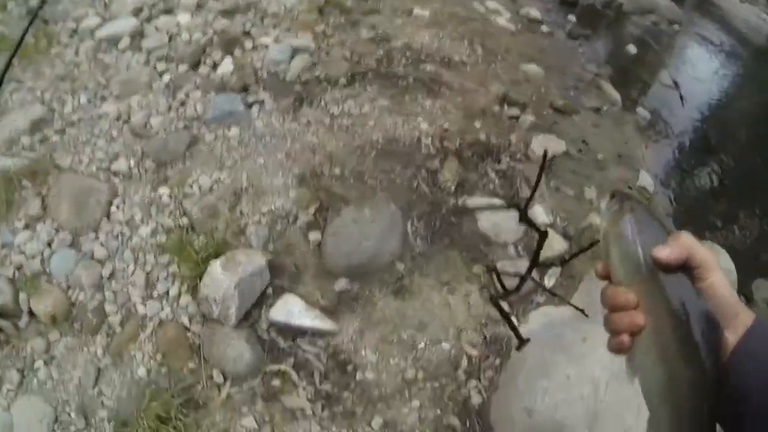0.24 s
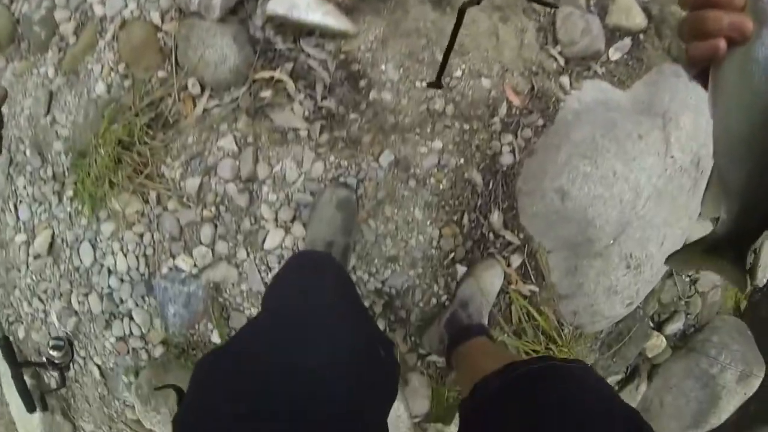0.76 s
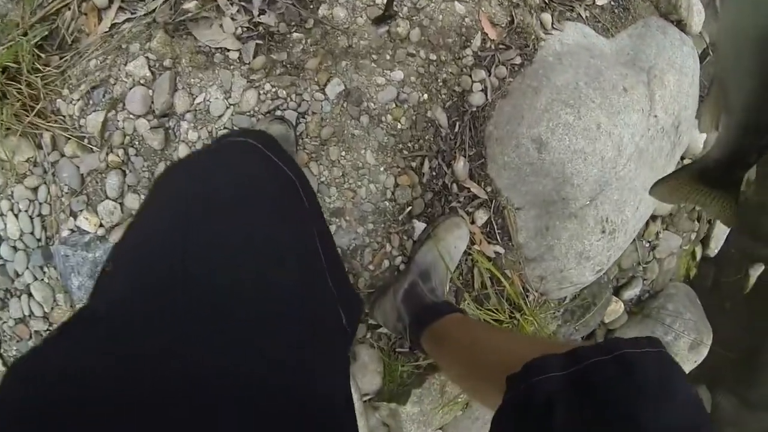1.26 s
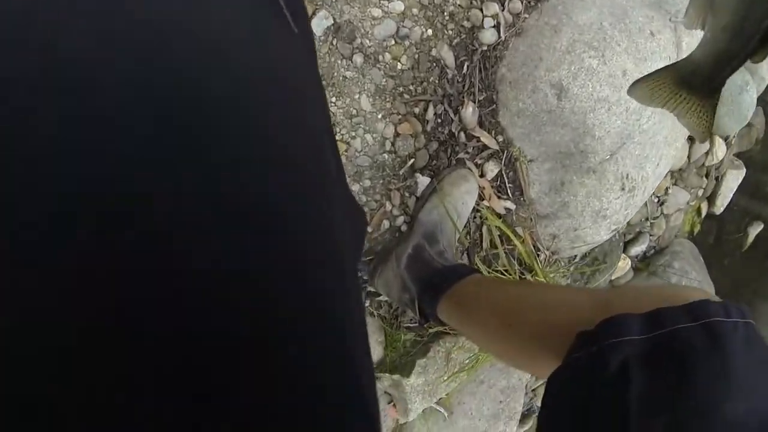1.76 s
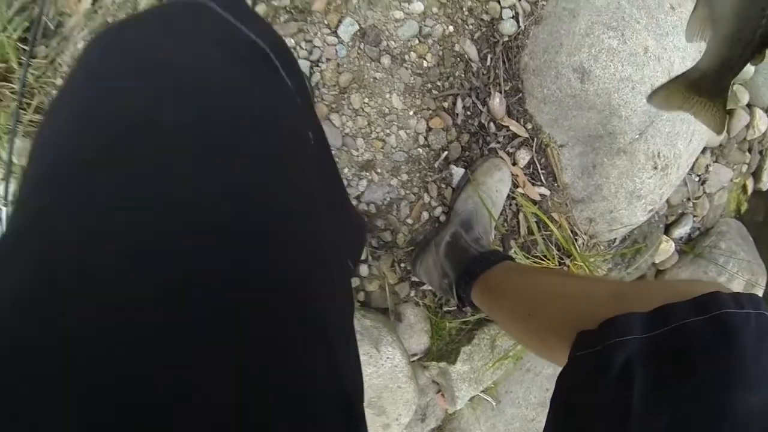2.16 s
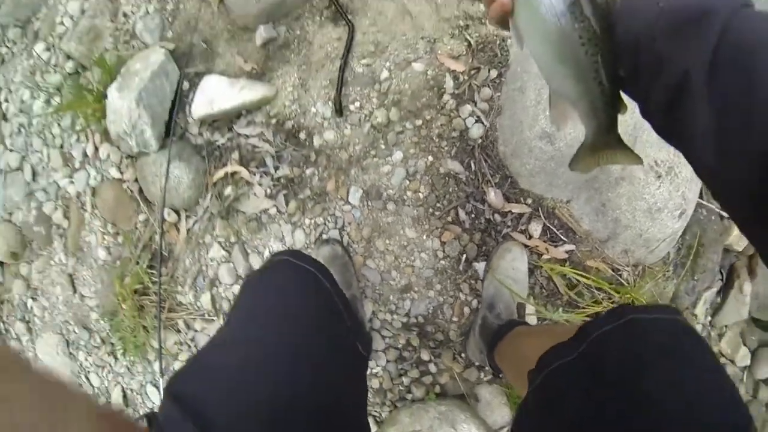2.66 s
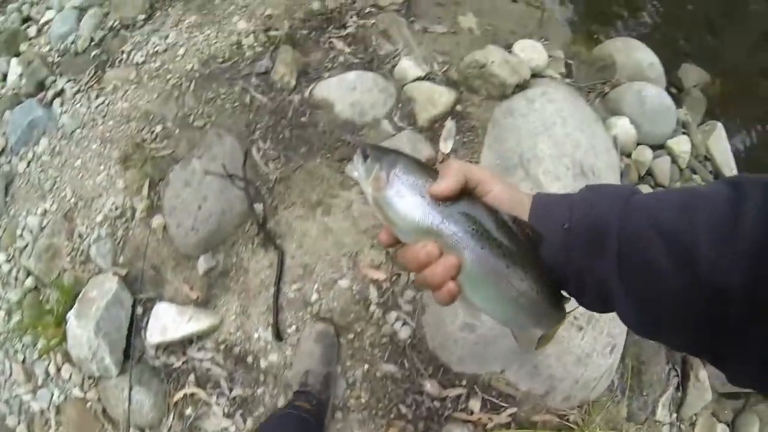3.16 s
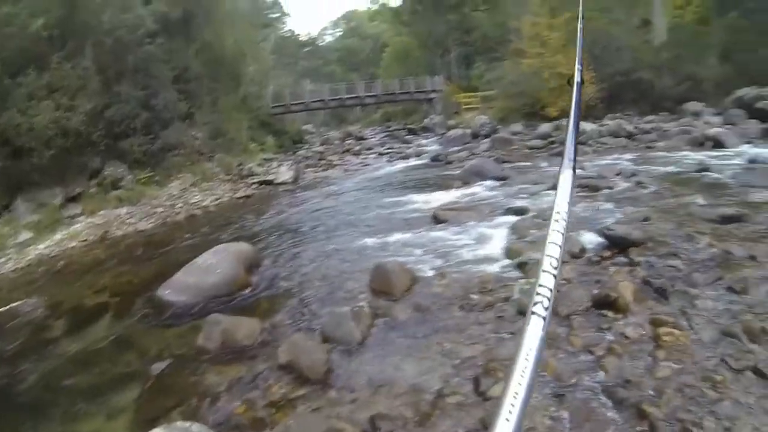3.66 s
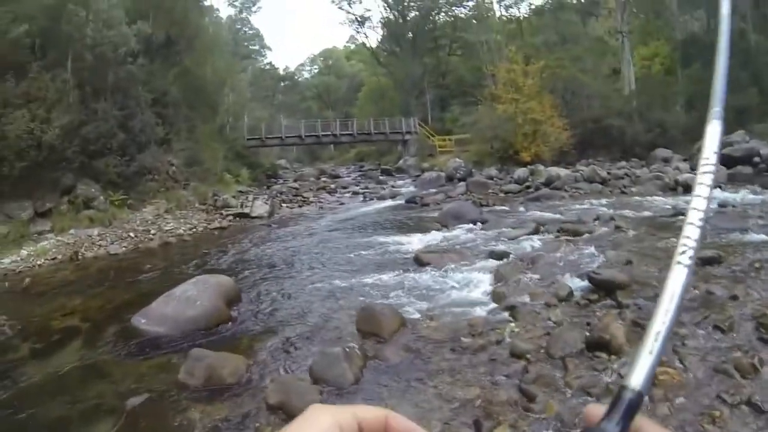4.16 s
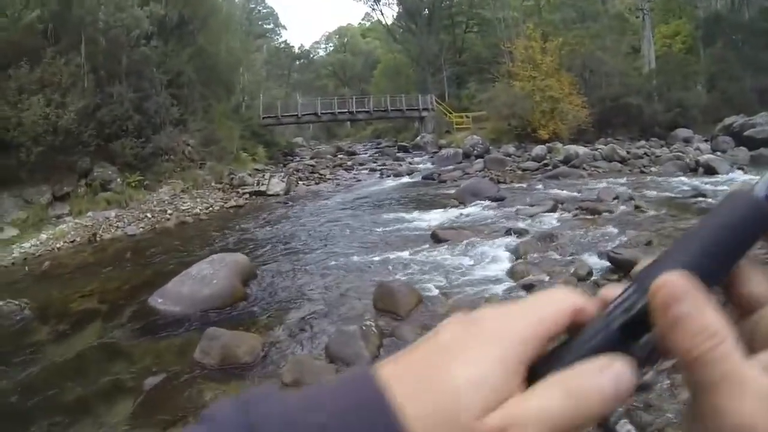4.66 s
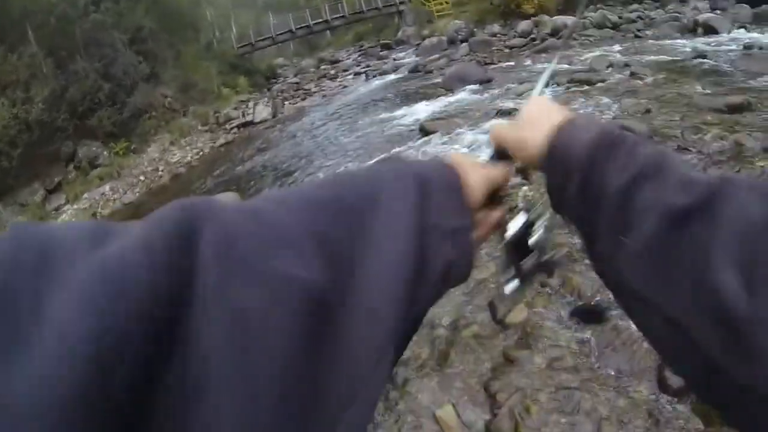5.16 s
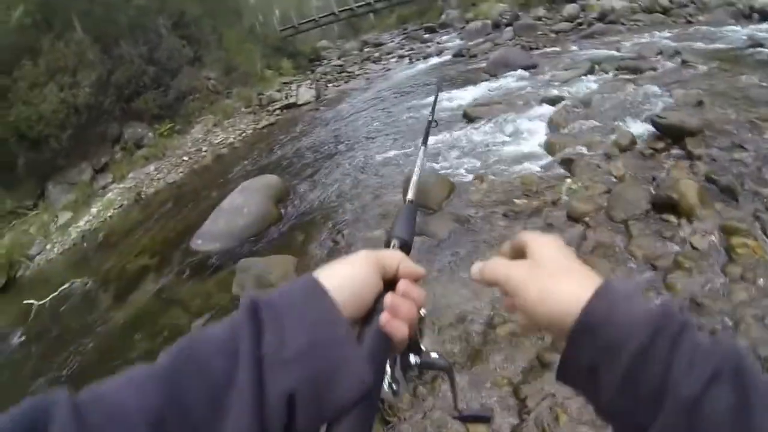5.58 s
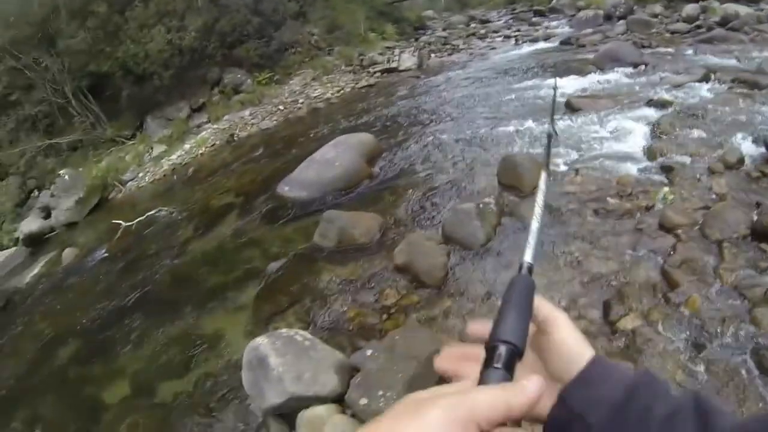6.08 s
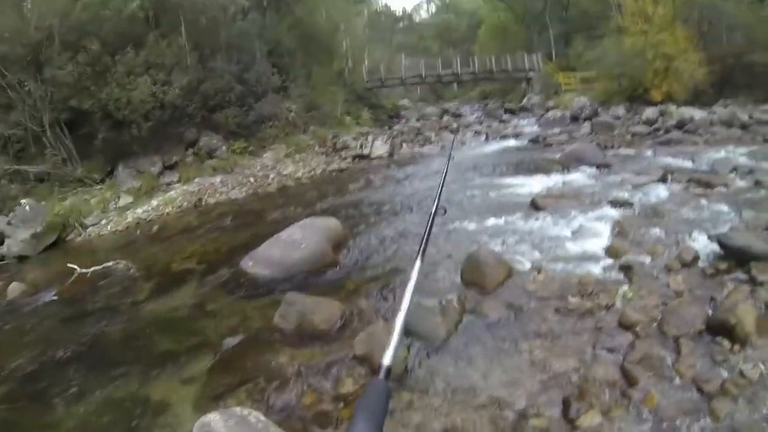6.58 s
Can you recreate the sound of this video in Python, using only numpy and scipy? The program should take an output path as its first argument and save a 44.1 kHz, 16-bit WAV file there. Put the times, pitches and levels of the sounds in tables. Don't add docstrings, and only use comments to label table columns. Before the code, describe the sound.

A plastic-cased microphone worn on the body, outdoors beside a rocky river. From 0 to 2.7 s the water is faint and muffled, under low wobbling rumbles of body movement. Cloth rubs briefly at 0.1-0.2 s, a dull knock lands at 0.5 s, fabric brushes softly around 1.4-1.7 s, and a short gritty gravel crunch comes at 2.1 s. From 2.75 to 3.35 s the mount is handled hard: loud deep thumps, hollow plastic knocks, bright sleeve scrapes, sharp creaks and a flurry of dry ticks, while the water sinks away. At 3.36 s an abrupt cut opens onto much louder, steady rapids, a boxy mid-range rush with bubbling and fine spray. Small bumps follow; at 5.0-5.4 s come moderate rustles, creaks, stony scrapes and thuds. A soft bump at 6.1 s and one faint creak at 6.7 s finish over continuing water.

```python
import sys
import numpy as np
from scipy import signal
from scipy.fft import rfft, irfft, next_fast_len
from scipy.io import wavfile
from scipy.ndimage import uniform_filter1d

SR = 44100
rng = np.random.default_rng(int(sys.argv[2]) if len(sys.argv) > 2 else 0)


def unload_wav(signal):
    wavfile.write(
        sys.argv[1],
        SR,
        np.round(np.clip(np.atleast_2d(signal).T, -1, 1) * 32767).astype(np.int16),
    )


def linear_from_db(decibels):
    return 10 ** (np.asarray(decibels, float) / 20)


N = 301203
T = np.arange(N) / SR
CUT_S = 3.3619


def unit(x):
    return x / np.sqrt(np.mean(x ** 2))


def colour(x, points, peaks=()):
    size = next_fast_len(N, True)
    hz = np.maximum(np.fft.rfftfreq(size, 1 / SR), 1)
    point_hz, point_db = np.transpose(points)
    db = np.interp(np.log(hz), np.log(point_hz), point_db)
    for peak_hz, width_hz, gain_db in peaks:
        db = db + gain_db / (1 + (2 * (hz - peak_hz) / width_hz) ** 2)
    return unit(irfft(rfft(x, size) * linear_from_db(db), size)[:N])


def band(x, lo_hz, hi_hz, order=2):
    sos = signal.butter(order, [lo_hz, hi_hz], "bandpass", fs=SR, output="sos")
    return unit(signal.sosfilt(sos, x))


def above(x, hz):
    size = next_fast_len(N, True)
    return irfft(rfft(x, size) * (np.fft.rfftfreq(size, 1 / SR) > hz), size)[:N]


def walk(rate_hz):
    k = int(SR / rate_hz)
    steps = np.repeat(rng.standard_normal(N // k + 1), k)
    return 0.86 * uniform_filter1d(uniform_filter1d(steps, k), k)[:N]


def ring(hz, t60_s):
    t = np.arange(int(0.12 * SR)) / SR
    return np.sin(2 * np.pi * hz * t) * np.exp(-np.log(1000) * t / t60_s)


def add(out, start_s, x):
    i = int(start_s * SR)
    out[i:i + len(x)] += x[:N - i]


def grains(rate_hz, spread_db):
    hit = rng.random(N) < rate_hz / SR
    sign = rng.standard_normal(N)
    size = rng.exponential(size=N)
    return unit(hit * sign * linear_from_db(spread_db * np.minimum(size, 4)))


def swells(rows, squareness):
    out = np.zeros((3, N))
    for mid_s, half_s, db, *rel_db in rows:
        near = slice(max(int((mid_s - 3 * half_s) * SR), 0), int((mid_s + 3 * half_s) * SR))
        layer_db = db + np.array([[0], *np.c_[rel_db]], dtype=float)
        hump = np.exp(-2 * np.abs((T[near] - mid_s) / half_s) ** squareness)
        out[:, near] += linear_from_db(layer_db) ** 2 * hump
    return np.sqrt(out)


def bubbles(rate_hz, turns, glide, spread_db):
    out, t = np.zeros(N), np.arange(1200) / SR
    for place, pitch, size in rng.random((4000, 3)):
        hz = 250 * 2 ** (4.175 * pitch)
        phase = hz * t * (1 + glide * hz * t / turns / 2)
        level = np.sqrt(hz) * linear_from_db(-spread_db * np.log(size + 0.017))
        pocket = level * np.sin(2 * np.pi * phase) * np.exp(-hz * t / turns)
        add(out, place * 4000 / rate_hz % T[-1], pocket)
    return unit(out)


# freq_hz, level_db (per Hz)
BANK = [(80, -10), (120, -4.5), (200, -6.5), (260, -17), (480, -20.5), (1150, -25.5), (1500, -16.5),
        (2070, -28.5), (2900, -26.5), (4200, -31), (8300, -37), (9500, -44), (13200, -40), (14500, -46),
        (15600, -48)]
RAPIDS = [(71, -28), (120, -6.5), (221, -6), (450, -6), (611, -10.5), (780, -6.5), (936, -15.5),
          (1270, -1.5), (1620, -1.5), (2340, -16), (3050, -13.5), (5490, -19.5), (8950, -33.5),
          (14000, -36.5), (15600, -44)]
# freq_hz, width_hz, gain_db
CASE = [(780, 300, 5.5), (896, 105, -3.5), (1370, 98, 1.5), (1613, 320, 5.5), (2144, 130, 6),
        (2915, 470, 5), (3614, 210, 4.5), (4880, 140, 3), (5360, 210, 3), (6400, 270, 0), (7000, 520, 1.5),
        (11170, 770, 7.5), (14000, 1200, 4)]
BANK_DB, RAPIDS_DB = -55, -47
DUCK_FROM_S, DUCK_DB_PER_S, DUCK_UNTIL_S, RECOVER_DB_PER_S = 2.714, -49, 3.2, 125
FADE_DB, FADE_S = -6, 0.022


def river():
    white, swell = np.zeros(N), walk(1.466)
    for hz in 90 * 2.0 ** np.arange(8):
        octave = band(rng.standard_normal(N), hz / np.sqrt(2), hz * np.sqrt(2))
        white += np.sqrt(hz) * linear_from_db(0.5 * swell + 1.7 * walk(12)) * octave
    water = unit(white) + linear_from_db(-12.5) * bubbles(600, turns=3.4, glide=0.082, spread_db=2.5)
    duck_db = DUCK_DB_PER_S * (np.clip(T, DUCK_FROM_S, DUCK_UNTIL_S) - DUCK_FROM_S)
    duck_db = duck_db + RECOVER_DB_PER_S * np.maximum(T - DUCK_UNTIL_S, 0)
    fade_db = FADE_DB * np.exp(-np.abs(T - CUT_S) / FADE_S)
    bank = linear_from_db(BANK_DB + duck_db) * colour(water, BANK, CASE)
    rapids = linear_from_db(RAPIDS_DB + fade_db) * colour(water, RAPIDS, CASE)
    return np.where(T < CUT_S, bank, rapids)


# time_s, level_db
SPRAY = [
    (3.37, -68.5),
    (4, -70.5),
    (5, -76.5),
    (5.5, -67.5),
    (6.3, -65),
    (6.83, -70.5),
]


def spray():
    ticks = band(grains(2500, 2.5) * linear_from_db(2 * walk(40)), 4400, 7800)
    return linear_from_db(np.interp(T, *np.transpose(SPRAY))) * ticks * (T > CUT_S + FADE_S)


# start_s, level_db, pitch_hz, length_s
BURSTS = [(0.168, -66, 5350, .047), (0.46, -64, 4200, .015), (1.309, -50, 1620, .006),
          (2.965, -55, 7000, .007), (5.157, -44, 1900, .012), (5.388, -52, 800, .012),
          (3.138, -44, 7000, .005), (3.162, -40, 6800, .005), (.5, -66, 4300, .09), (.62, -66, 4300, .09),
          (.72, -67, 4300, .07), (5.9, -52, 1500, .05), (5.97, -51, 1480, .04), (3.8, -53, 1600, .06),
          (2.998, -46.5, 6760, .028), (2.829, -49, 8200, .011), (2.758, -50.5, 10700, 0.015),
          (.176, -50, 1920, .025), (5.255, -46, 1750, .018), (1.384, -56, 2800, 0.013),
          (1.437, -63.5, 5300, .01), (2.095, -47, 1540, 0.028), (1.9, -57, 2600, 0.007),
          (5.147, -45, 1990, .03), (5.153, -53, 3780, 0.047)]
# start_s, level_db, length_s
CRUNCH = [
    (1.354, -59, .006),
    (2.085, -49, 0.0054),
    (2.092, -37.5, 0.0062),
    (2.098, -42.5, 0.0066),
    (2.104, -44, .006),
    (2.154, -62, .005),
    (2.223, -52, 0.0063),
    (2.228, -55, .006),
]
# pitch_hz, gain_db
GRIT = [(3500, 2.5), (5250, -6), (7700, -14), (9600, -16), (12200, -16)]


def gravel_and_bursts():
    out, grit, t = np.zeros(N), grains(12000, 1), T[:4000]
    crunches = [(s, db + gain_db, hz, length_s) for s, db, length_s in CRUNCH for hz, gain_db in GRIT]
    for start_s, db, hz, length_s in list(BURSTS) + crunches:
        rough = band(grit[int(start_s * SR):][:4000], hz / 1.07, hz * 1.07)
        envelope = np.minimum(8 * t / length_s, 1) * np.exp(-2 * (t / length_s) ** 4)
        add(out, start_s, linear_from_db(db) * envelope * rough)
    return out


# mid_s, half_s, level_db, dull_rel_db, hiss_rel_db
STROKES = [(0, 0.005, -50.5, 11, -2), (.1, 0.095, -60.5, 0.5, -9), (.198, .03, -43.5, -2, -13),
           (.16, 0.018, -52, -3, -13), (.48, 0.058, -58, -1, -5), (.68, 0.069, -64.5, -9, 0),
           (1.43, 0.1, -64.5, 3, -5), (1.65, .14, -51.5, -1, -11), (2.07, 0.1, -58.5, -2.5, -5.5),
           (2.24, 0.17, -62, -5.5, -5.5), (2.79, 0.032, -41, -17, -13), (2.855, 0.023, -39, -4, -11),
           (2.925, 0.039, -40, -13, -15), (3.005, 0.035, -42, -15, -12), (3.095, 0.029, -47, -4, -16),
           (3.17, 0.036, -42.5, 3.5, -18), (3.235, 0.02, -58, 3, -7), (3.345, 0.021, -63, 8, -16),
           (3.305, .02, -66, 12, -10), (5, 0.061, -62.5, 4, -7), (5.06, 0.028, -47, -1, -8),
           (5.16, 0.036, -46, 1.5, -13), (5.255, 0.031, -51.5, 0, -10), (5.38, 0.14, -60, -6, 0)]


def cloth():
    slips = grains(7000, 2) * linear_from_db(2 * walk(70))
    main = colour(slips, [(700, -36), (1100, 2.5), (1500, 8), (2000, 3), (2600, -21), (4000, -47)], CASE)
    dull = colour(slips, [(120, -28), (250, -7.5), (500, -6), (800, -6), (1100, -16.5), (2000, -47)], CASE)
    hiss = colour(slips, [(1500, -37), (2500, 1.5), (3800, 1), (5500, -7.5), (6200, -30), (9000, -50)], CASE)
    return np.sum(swells(STROKES, squareness=2.8) * [main, dull, hiss], axis=0)


# freq_hz, level_db (per Hz)
CLOTH = [(1200, -16), (2200, -2), (3200, -3.5), (4200, -12), (5500, -11.5), (6400, -19), (8000, -18),
         (9200, -26), (11000, -25.5), (12500, -29), (14500, -39)]
# freq_hz, width_hz, gain_db
SCRAPE = [(3170, 400, 3.5), (5630, 350, 12), (6900, 300, 9), (8330, 400, 7), (10700, 900, 6),
          (13700, 400, 6)]
# start_s, level_db, hold_s, release_s
DRAG = [(2.7575, -37, 0.012, 0.012), (2.78, -43, 0.076, 0.02), (2.896, -53, 0.051, .01),
        (2.9738, -37, .001, .002), (2.9947, -35, 0.001, .002), (3.01, -36, 0.001, 0.002),
        (3.1768, -45, .002, .001), (3.1143, -48, .002, .002), (3.3527, -58, .005, .001),
        (3.312, -68, .008, .002), (3, -46.5, .018, 0.019), (3.0982, -46, .001, .002),
        (3.139, -37, 0.001, .0015), (3.1605, -42, 0.002, 0.001), (3.1638, -32, .0006, .0013),
        (3.193, -40, 0.0011, .002)]
DRAG_ATTACK_S = 0.0012


def drag_and_bursts():
    scrape = colour(grains(6000, 0.61) * linear_from_db(2.1 * walk(150)), CLOTH, SCRAPE)
    pull = np.zeros(N)
    for start_s, db, hold_s, release_s in DRAG:
        attack = np.clip((T - start_s) / DRAG_ATTACK_S + 1, 0, 1)
        pull += linear_from_db(db) * attack * np.exp(-np.maximum(T - start_s - hold_s, 0) / release_s)
    return pull * scrape


# start_s, peak_db, pitch_hz, t60_s
KNOCKS = [(0.502, -22, 720, 0.045), (.502, -27, 270, 0.032), (0.5062, -41, 1040, 0.047),
          (0.5056, -27.5, 494, 0.014), (2.8515, -24, 1300, .025), (2.795, -24, 179, 0.083),
          (2.899, -22, 310, 0.014), (2.933, -17, 170, 0.011), (3.018, -27, 140, 0.03),
          (2.756, -24.5, 136, 0.034), (3.265, -30, 170, .03), (3.197, -24, 284, .02),
          (5.268, -40, 650, 0.018), (3.129, -23, 130, 0.07), (3.229, -19, 370, 0.011),
          (3.2295, -27, 620, 0.015), (3.232, -24, 480, 0.02), (3.721, -40, 177, 0.095), (4.28, -45, 56, .1),
          (4.963, -35.5, 407, 0.077), (5.165, -26, 129, 0.081), (5.39, -36, 750, .03),
          (6.09, -44.5, 154, .06)]


def knocks():
    out = np.zeros(N)
    for start_s, db, hz, t60_s in KNOCKS:
        add(out, start_s, -linear_from_db(db) * np.convolve(ring(hz, t60_s), np.hanning(30) / 14.5))
    return out


# start_s, level_db
TICKS = [(.2175, -60), (2.9841, -47), (2.995, -37), (3.051, -45), (3.0563, -47), (3.063, -55),
         (3.0896, -50), (3.1102, -56), (3.1272, -53), (3.1486, -51), (3.1739, -46), (3.1768, -37),
         (3.1785, -44), (3.1843, -42), (3.1891, -44), (3.1935, -36), (3.1983, -43), (3.204, -42),
         (3.2076, -44), (3.2113, -37), (3.2152, -43), (3.2196, -44), (3.2323, -48), (3.2406, -57),
         (3.2434, -57), (3.2476, -52), (3.2587, -64), (3.2643, -47), (3.2674, -49), (3.2694, -49),
         (3.2733, -50), (3.2792, -50), (3.2944, -67), (3.3358, -51), (3.3448, -55), (3.3527, -55),
         (3.3573, -52), (5.1605, -53), (5.182, -50), (5.194, -54)]
TICK_RISE_S, TICK_FALL_S = 0.00005, 0.001


def hinge_ticks():
    out, t = np.zeros(N), T[:900]
    pulse = (1 - np.exp(-(t / TICK_RISE_S) ** 2)) * np.exp(-t / TICK_FALL_S)
    for start_s, db in TICKS:
        add(out, start_s, linear_from_db(db + 12) * pulse)
    return out


# start_s, peak_db, brightness_db
CREAKS = [(2.762, -30, -4), (2.799, -16.5, -27), (2.851, -20, -16), (2.8976, -9, -34), (2.9615, -32, -11),
          (2.9731, -25, 6.5), (2.9944, -16, -2), (3.0092, -17, 1), (3.017, -21.5, -28), (3.0405, -26, -24),
          (3.0775, -30, -25), (3.0898, -27, -23), (3.097, -15, -20), (3.1138, -27, -9), (3.1355, -18, -19),
          (3.1387, -8.5, -15), (3.1585, -19, -14), (3.1608, -13, -13), (3.163, -9, -19), (3.1763, -21, -16),
          (3.193, -22, -13), (3.231, -44, 3), (3.266, -41, -10), (3.3547, -39, -2), (5.0537, -38, -18),
          (5.071, -31.5, -18), (5.1827, -40, 2), (5.2608, -34.5, -17), (5.39, -38, -11),
          (6.7374, -31.5, -14)]
# pitch_hz, gain_db, t60_s
SHELL = [
    [(825, -15, 0.015), (1455, -11, 0.02), (1676, 12.5, 0.013), (2130, -4, 0.016)],
    [(2280, 18, 0.017), (2770, 20.5, 0.01), (3200, 16, 0.009)],
    [(4500, 17, 0.0061), (5380, 20, 0.0081), (7000, 16, 0.008), (8300, -26, .003), (11100, -1, .002)],
]
TREBLE_DB = -8


def creaks():
    out, t = np.zeros(N), T[:160]
    for start_s, db, bright_db in CREAKS:
        slip = rng.standard_normal(160) * t * np.exp(-t / 0.00055)
        detune = 1 + rng.standard_normal(20) / 30
        for group, group_db in zip(SHELL, [0, bright_db, bright_db + TREBLE_DB]):
            body = sum(linear_from_db(g) * ring(hz * d, t60_s) for (hz, g, t60_s), d in zip(group, detune))
            sound = np.convolve(np.convolve(slip, body), np.hanning(7))
            add(out, start_s, linear_from_db(db + group_db + 0.55) * sound / np.abs(sound).max())
    return out


# mid_s, peak_db, half_s, direction
SHOVES = [(1.936, -32, .012, -0.91), (2.76, -20.5, .004, -1), (2.799, -9, 0.0058, -1),
          (2.824, -12.5, 0.019, 1), (2.855, -10.5, 0.013, -1.05), (2.892, -17, 0.013, 1),
          (2.934, -10.5, 0.0066, 1), (2.961, -13, .009, -1), (2.979, -15, .008, 1), (3.007, -16, .012, 1),
          (3.025, -7, 0.0058, -0.96), (3.041, -13, .01, -1), (3.071, -12, .012, 1), (3.104, -20, .004, -1),
          (3.159, -15.5, 0.0092, 1), (3.176, -15, 0.0042, 1), (3.2305, -8, .0011, -1.03),
          (3.241, -10, .008, -1), (3.29, -15.5, 0.013, 1), (3.334, -18, 0.0097, 1), (3.3525, -13, .004, -1),
          (3.256, -17, .01, -1), (5.31, -26, .03, 1), (5.365, -25, .018, -1), (5.03, -20, .013, -1),
          (5.068, -22, 0.023, 1), (5.138, -22, .012, -1), (5.205, -23.5, 0.0093, -0.96),
          (6.045, -28, 0.023, -1.1)]


def shoves():
    return sum(way * linear_from_db(db) * np.exp(-((T - mid_s) / half_s) ** 2) for mid_s, db, half_s, way in SHOVES)


def wobble(hz, wander_oct, rate_hz):
    return unit(np.sin(2 * np.pi * np.cumsum(hz * 2 ** (wander_oct * walk(rate_hz))) / SR))


# sway_db, jolt_db, shudder_db
RESTLESS = [
    (-36, -55.5, -57.5),
    (-41, -60, -60.5),
]
# mid_s, half_s, sway_db, jolt_rel_db, shudder_rel_db
BANK_MOVES = [(0, 0.026, -41, 6, 4.5), (.17, 0.07, -15.5, -24, -31), (.2, 0.026, -31, -8, -7.5),
              (.41, 0.045, -28.5, -40, -30), (.52, 0.037, -21, -14, -18.5), (.72, .05, -29, -20, -35),
              (.84, .04, -26, -18, -33), (1.09, 0.054, -29.5, -21, -22.5), (1.23, .04, -46.5, -11, -3.5),
              (1.62, 0.24, -40, -18, -6.5), (1.92, 0.052, -31.5, -10, -26), (2.15, .12, -41.5, -26, -8),
              (2.45, .04, -30, -28, -27), (2.63, 0.054, -25.5, -16, -30), (2.8, 0.04, -29, -3, -4),
              (2.93, 0.05, -31, -1, -2), (3.02, 0.06, -29, -2, -6), (3.13, 0.085, -30, 3, -4),
              (3.235, 0.02, -28, -5, -12), (3.29, 0.022, -30, -15, -20), (3.35, 0.011, -25, -3.5, -15)]
ROD_MOVES = [(3.56, .06, -36.5, -12, -15), (3.74, .04, -42, -8, -13), (3.9, .12, -38, -20, -25),
             (4.33, .05, -42, -6, -15), (4.88, .06, -36, -18, -20), (4.6, 0.11, -40.5, -10, -17.5),
             (5.03, 0.098, -31.5, -14, -12.5), (5.19, 0.081, -31, -7, -9.5), (5.35, 0.082, -28.5, -24, -22),
             (5.47, 0.045, -31.5, -26, -24), (5.7, 0.039, -34, -25, -28), (6.35, 0.13, -46, -8, -12),
             (6.56, .07, -43, -4, -8), (5.92, .06, -45, -6, -11), (6.1, 0.062, -38, -16, -12.5),
             (6.8, 0.12, -49, -12, 0)]
STEP_DB, STEP_S = -13.5, 0.012


def membrane():
    sway = unit(wobble(9.8, 0.4, 6.3) + 0.3 * band(rng.standard_normal(N), 13.1, 26))
    jolt = unit(wobble(34, 0.34, 23) + band(rng.standard_normal(N), 23.4, 46))
    shudder = colour(grains(400, 1.95), [(40, -26), (70, 6.5), (130, -2), (200, -4.5), (300, -17),
                                         (600, -41.5), (1200, -94)])
    before_db, after_db = np.array(RESTLESS)[:, :, None]
    wander_db = 2.5 * np.array([walk(9) for _ in before_db])
    restless = linear_from_db(np.where(T < CUT_S, before_db, after_db) + wander_db)
    moves = np.where(T < CUT_S, swells(BANK_MOVES, squareness=2.2), swells(ROD_MOVES, squareness=2.2))
    motion = np.sum(np.hypot(restless, moves) * [sway, jolt, shudder], axis=0)
    held = -linear_from_db(STEP_DB) * (T < CUT_S) * np.exp(np.minimum(T - CUT_S, 0) / STEP_S)
    still = 1 - np.exp(-np.abs(T - CUT_S) / STEP_S)
    return shoves() + still * motion + held


def rank(x):
    return np.argsort(np.argsort(x)) / N


# start_s, end_s, lost_share
STARVED = [(.07, .49, .65), (.65, .74, .6), (.8, .97, .55), (1.02, 1.17, .5), (1.22, 1.31, .85),
           (1.46, 1.49, .7), (1.86, 1.9, .6), (2.05, 2.07, .9), (2.18, 2.21, .9), (2.35, 2.47, .97),
           (2.57, 2.75, .65), (2.88, 2.99, .8), (3.025, 3.135, .95), (3.22, 3.333, .95), (5.02, 5.05, .6),
           (5.19, 5.21, .5)]
# freq_hz, lost_share
EDGE = [(14150, .15), (14450, .5), (14750, .82), (15050, .96)]


def thinned(x):
    quick, slow = walk(110), walk(7)
    share = sum(p * (T > start_s) * (T < end_s) for start_s, end_s, p in STARVED)
    lost = uniform_filter1d(1.0 * (rank(quick) < share), size=200)
    x = x - lost * above(x, 12700)
    fray = uniform_filter1d(quick, size=900) + 0.1 * slow
    for k, (hz, share) in enumerate(EDGE):
        strip = above(x, hz)
        if k + 1 < len(EDGE):
            strip = strip - above(x, EDGE[k + 1][0])
        lost = uniform_filter1d(1.0 * (rank(np.roll(fray, 30011 * k)) < share), size=500)
        x = x - lost * strip
    return x


def scene():
    heard = thinned(river() + spray() + cloth() + drag_and_bursts())
    heard = heard + gravel_and_bursts() + knocks() + hinge_ticks() + creaks()
    top_cut = signal.ellip(8, 0.3, 45, 15700, fs=SR, output="sos")
    return (signal.sosfilt(top_cut, heard) + membrane())[None]


def roll_off(x):
    return signal.sosfilt(signal.butter(12, 16000, fs=SR, output="sos"), x)


def record(dry):
    return roll_off(dry)


dry = scene()
out = record(dry)
unload_wav(out)
```